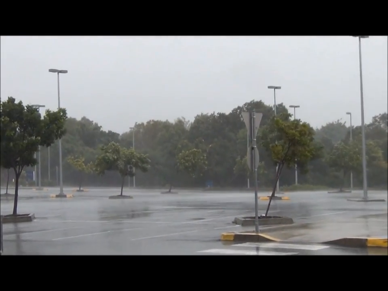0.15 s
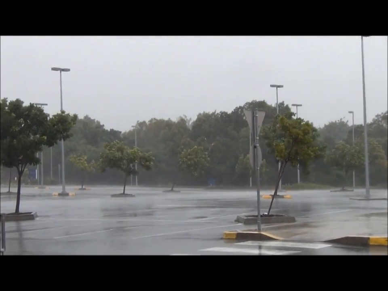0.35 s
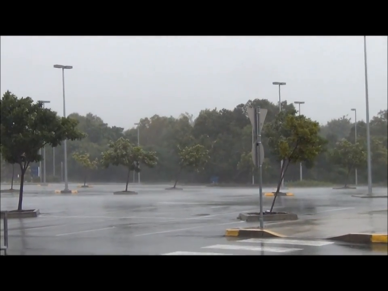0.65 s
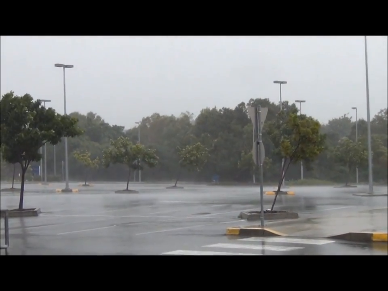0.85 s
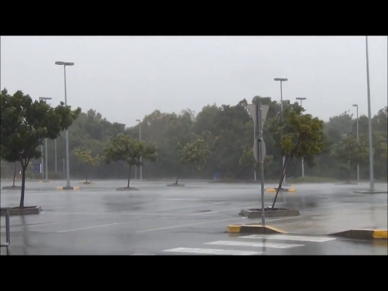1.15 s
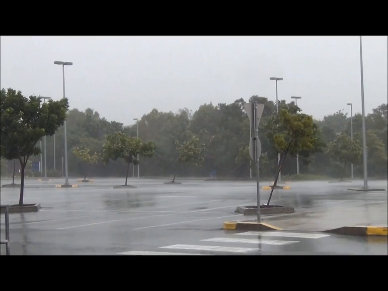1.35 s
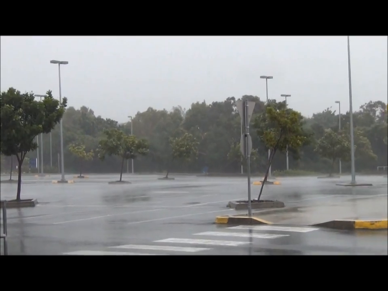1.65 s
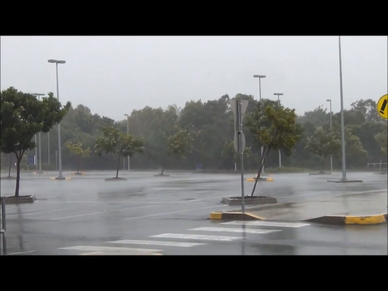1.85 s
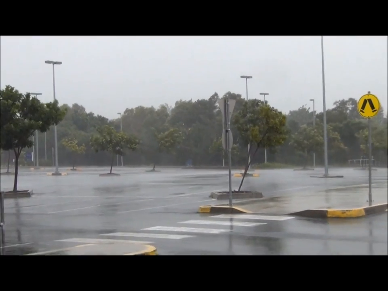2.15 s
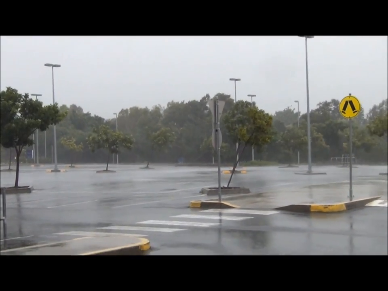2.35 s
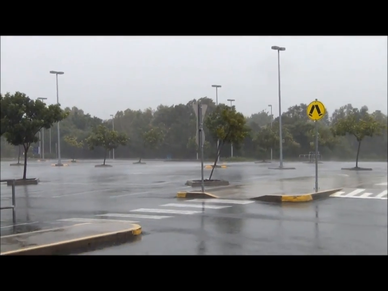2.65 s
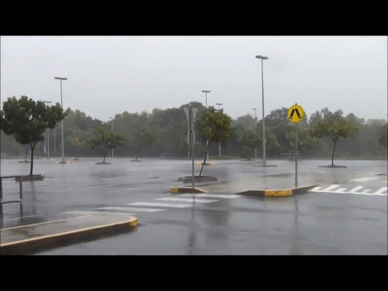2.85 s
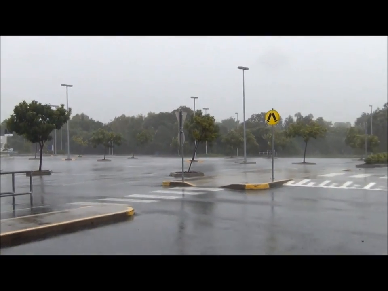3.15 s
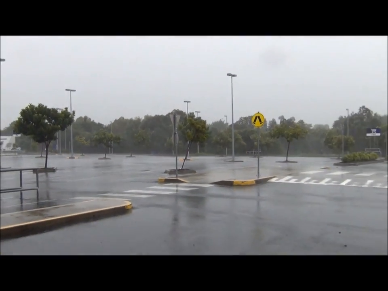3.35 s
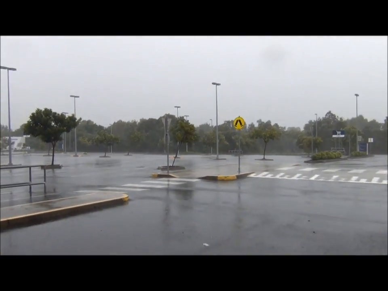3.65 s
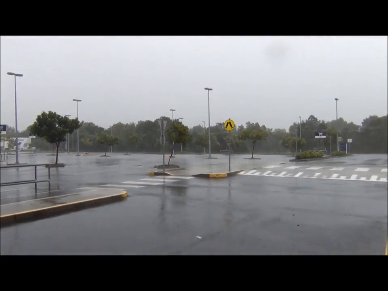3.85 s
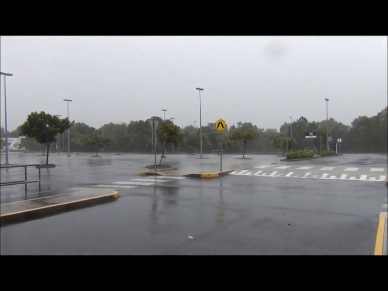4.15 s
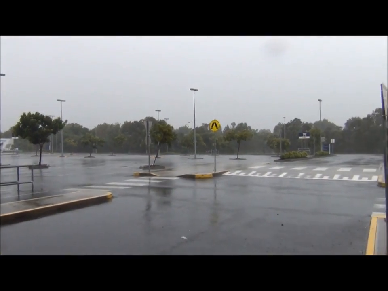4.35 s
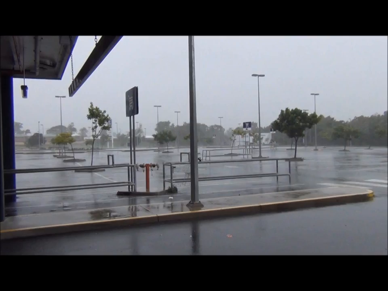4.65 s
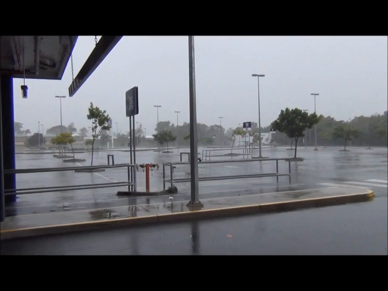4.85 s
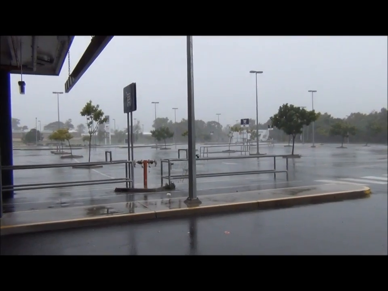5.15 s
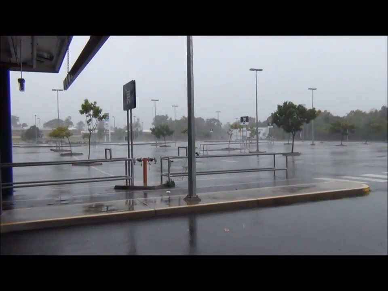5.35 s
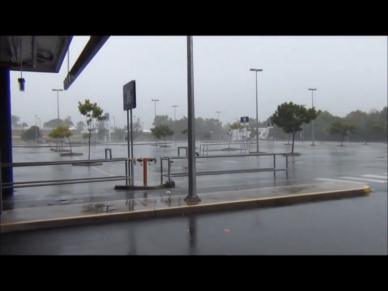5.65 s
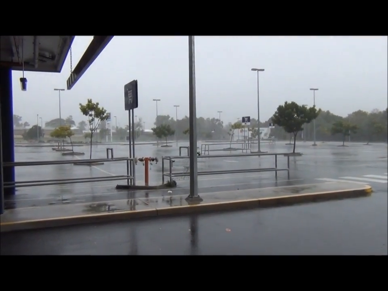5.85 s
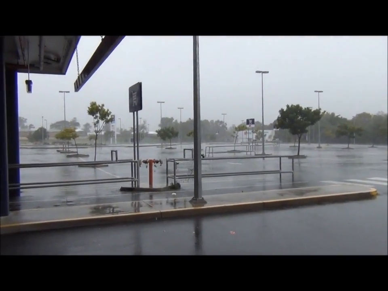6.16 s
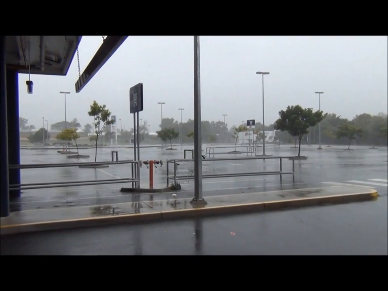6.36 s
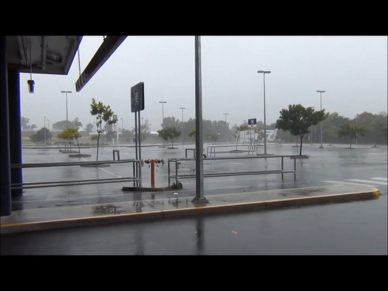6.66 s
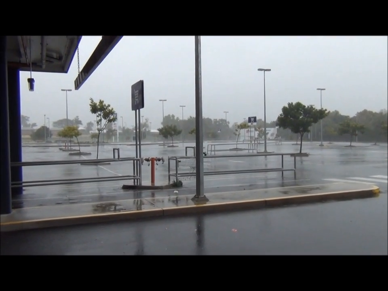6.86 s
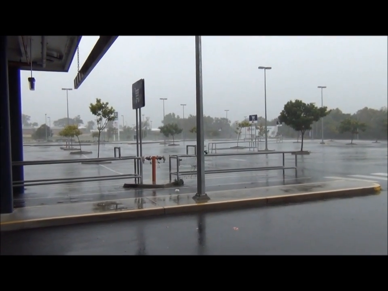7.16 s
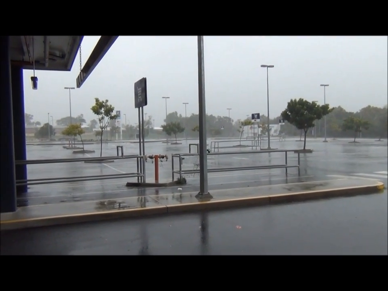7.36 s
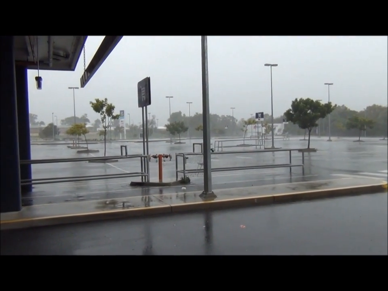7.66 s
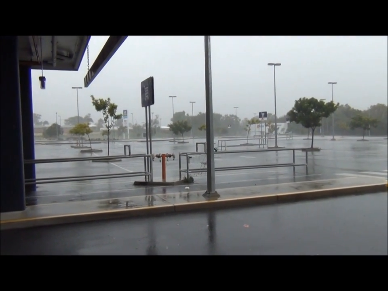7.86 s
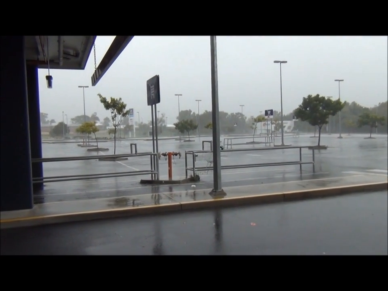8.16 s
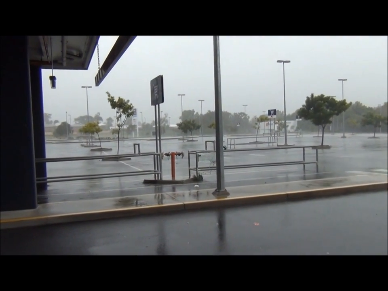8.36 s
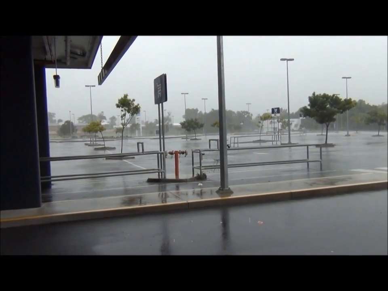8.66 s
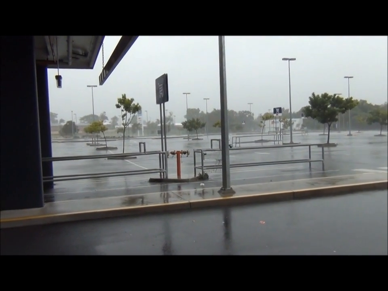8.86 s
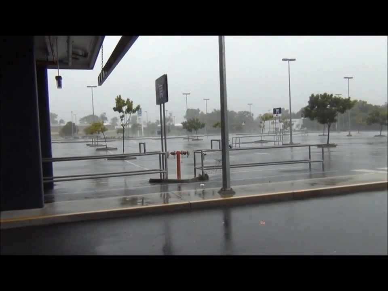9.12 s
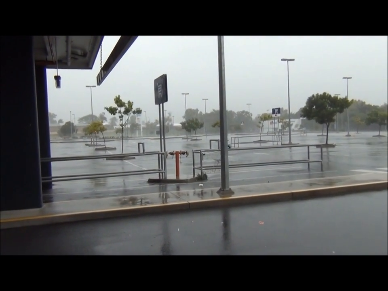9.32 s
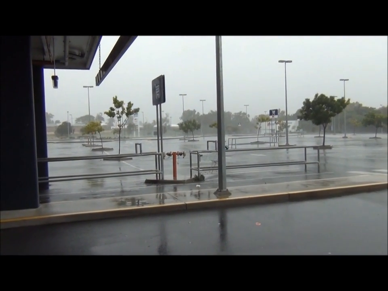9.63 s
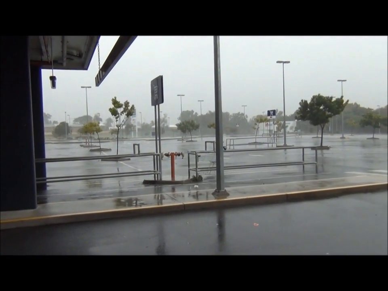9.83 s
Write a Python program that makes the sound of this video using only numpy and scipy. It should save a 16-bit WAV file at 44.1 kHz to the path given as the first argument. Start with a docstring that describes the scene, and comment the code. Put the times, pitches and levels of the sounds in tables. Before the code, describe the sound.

Heavy rain roars steadily over a wet open car park, wind buffeting the microphone, brief silence midway, then closer drops ticking and an engine humming.

```python
"""A car park in heavy rain, heard from under a shop awning: first facing out, then, after a short
silence, along the wall. Rain is noise in third-octave slices, grained by random drops; wind on the
microphone is low noise in uneven puffs. Close drops are filtered noise ticks with splashes, plops
are rising bubbles, a small metal part jingles in decaying modes, and a generator behind the building
drones in multiples of its engine cycle. A faint electronic whine lies under it all."""
import sys
import numpy as np
from scipy import signal
from scipy.fft import rfft, irfft, next_fast_len
from scipy.io import wavfile
from scipy.ndimage import uniform_filter1d

SR = 44100
rng = np.random.default_rng(int(sys.argv[2]) if len(sys.argv) > 2 else 0)


def unload_audio(sound):
    """Save the sound as a 16-bit wav file, at the path given as the first command line argument."""
    columns = np.transpose(np.atleast_2d(sound))
    # keep every value between -1 and 1, then stretch to whole-number steps
    steps = np.round(np.clip(columns, -1, 1) * 32767)
    wavfile.write(sys.argv[1], SR, steps.astype(np.int16))


N = 440559
MOVE_S = 4.75  # from here on, the second standpoint
T = np.arange(N) / SR
SECOND = T > MOVE_S
MS = np.int32(1000 * T)  # whole milliseconds at each sample


def rain(roar_db, spray_db, runoff_db, pan_db):
    """Far drops merge into a roar; near ones stay grainy in the treble, which follows the spray."""
    # rain colour, density per Hz before the overall level: centre_hz, first_standpoint_db, second_standpoint_db
    rain_colour = [(160, -9.5, -21), (244, -4, -5), (329, 5.5, 5), (484, 2.5, 0), (720, 1.5, 0.5),
                   (1036, -1, -3), (1300, -0.5, -2.5), (1970, -3.5, -4.5), (2700, -6, -8.5),
                   (3480, -6.5, -9), (4090, -7, -13.5), (6500, -8.5, -17), (9000, -15.5, -20.5),
                   (12000, -17.5, -22), (16000, -22, -29.5)]
    fine = spatter(900, 3.4, 0.00024)
    coarse = spatter(60, 2.9, 0.013)
    drips = spatter(40, 1.5, 0.012)  # runoff from the awning edge
    sheet = walk(4.5)  # slow swell shared by the upper slices
    out = 0
    centres = 160 * 2 ** np.arange(0, 6.8, 1 / 3)
    for hz, pair in bands(rng.standard_normal((2, N)), centres):
        near = np.clip(np.log2(hz / 900) / 3.3, 0, 1)
        runoff = np.exp(-(np.log2(hz / 2800) / 0.6) ** 2)
        treble = np.clip(np.log2(hz / 2800) / 0.76, 0, 1)
        near_power = near * (0.25 * fine ** 2 + 0.22 * coarse ** 2)
        drip_power = 0.25 * runoff * (drips ** 2 - .5)
        grain = np.sqrt(1 - 0.38 * near + near_power + drip_power)
        colour_db = np.float32(np.where(SECOND, at(rain_colour, hz, column=2), at(rain_colour, hz)))
        db = colour_db + treble * spray_db + runoff * runoff_db
        db = db + .8 * near * sheet + 0.85 * walk(12)
        out = out + undb(db) * np.float32(grain) * spread(pair, hz) * lean(pan_db, hz)
    return out * undb(roar_db + 16.0)


def spatter(per_s, scatter_db, tail_s):
    """Drops at random moments, some bigger than most; each is a short burst of splash."""
    size_db = scatter_db * np.minimum(rng.exponential(size=N), 3)
    blows = (rng.random(N) < per_s / SR) * undb(size_db)
    power = signal.lfilter([1], [1, -np.exp(-1 / (tail_s * SR))], blows ** 2)
    return unit(power ** .5)


def dips():
    """The level drops suddenly, then creeps up at a fixed rate; no dip outlasts its standpoint."""
    # sudden dips: start_s, depth_db
    sudden_dips = [(-.03, 10.5), (3.96, 6.5), (5.585, 8)]
    fall_s, creep_db_per_s = 0.022, 2.5
    out = 0
    for s, depth_db in sudden_dips:
        left_db = np.maximum(depth_db - creep_db_per_s * (T - s), 0)
        left_db = left_db * np.clip((T - s) / fall_s, 0, 1)
        out = out - left_db * (SECOND == (s > MOVE_S))
    return np.float32(out)


def wind(rumble_db, deep_db):
    """Eddies over the microphone: a low rumble in uneven puffs; big slow eddies add the deepest part."""
    # rumble colour, density per Hz before the overall level: centre_hz, level_db
    rumble_colour = [(30, -46.5), (50, -24.5), (80, -13.5), (130, -4), (200, 0.5), (330, -3.5),
                     (480, -11.5), (800, -24.5)]
    out, puffs = 0, walk(14)
    centres = 31 * 2 ** np.arange(0, 4.8, 1 / 3)
    for hz, pair in bands(rng.standard_normal((2, N)), centres):
        deep = np.clip(np.log2(140 / hz) / 1.3, 0, 1)
        db = at(rumble_colour, hz) + deep * deep_db + 1.1 * puffs + walk(9)
        out = out + undb(db) * spread(pair, hz)
    return out * undb(rumble_db + 22)


def gusts(steady_db):
    """Gusts hit the microphone: the power of each rises, holds and falls on top of the steady wind."""
    # gusts, levels before the overall wind gain: start_s, hold_s, rumble_db
    gust_rows = [(0, 0.13, -17.5), (0.164, 0.14, -14), (0.48, 0.041, -19), (1.2, 0.11, -20.5),
                 (1.48, 0.21, -27.5), (6.38, .03, -28.5), (9.044, 0.28, -34)]
    rise_s, fall_s = 0.047, 0.2
    power = undb(steady_db) ** 2
    for s, hold_s, db in gust_rows:
        rise = (T - s) / rise_s
        fall = 1 - (T - s - rise_s - hold_s) / fall_s
        shape = np.clip(np.minimum(rise, fall), 0, 1)
        power = power + (undb(db) * shape) ** 2
    return np.float32(10 * np.log10(power))


def drops(dip_db):
    """A sharp tick coloured by the surface that is hit, spray falling back after it, and a duller splash."""
    # big drops close to the microphone: start_s, tick_peak_db (before panning), centre_hz, width_hz
    big_drops = [(.827, -23, 10000, 9000), (1.07, -21, 10000, 6000), (2.09, -24, 6500, 5000),
                 (2.36, -25, 10000, 8000), (2.860, -22, 11000, 7000), (2.909, -17.5, 9000, 5000),
                 (3.066, -23, 12500, 5000), (3.134, -21, 8500, 5000), (3.366, -16, 9000, 8000),
                 (3.986, -19, 7250, 5000), (5.577, -23, 8700, 1300), (5.611, -20, 11000, 8000),
                 (5.835, -20.5, 8140, 3000), (6.102, -22, 8500, 7000), (6.173, -24, 8600, 1300),
                 (6.20, -25, 12000, 5000), (6.296, -22, 10000, 7000), (6.397, -24, 6500, 5000),
                 (6.485, -22, 8500, 3000), (6.747, -22, 8700, 1500), (6.970, -22, 12000, 5000),
                 (7.294, -26, 8740, 900), (7.365, -24, 9000, 1500), (7.410, -16, 9000, 2500),
                 (7.505, -20, 9100, 2000), (7.713, -23, 8000, 4000), (7.746, -20.5, 8700, 900),
                 (7.840, -16.5, 8050, 6000), (8.028, -22.5, 7300, 4500), (8.079, -25, 8000, 3000),
                 (8.120, -18, 12000, 7000), (8.337, -21.5, 7600, 3000), (8.371, -18, 13000, 6000),
                 (8.467, -22, 7900, 3000), (8.520, -18.5, 8150, 2500), (8.641, -22, 8000, 6000),
                 (8.876, -26, 13500, 4000), (9.245, -29, 14500, 3000), (9.395, -30, 9000, 2000),
                 (9.512, -27, 13500, 4000)]
    # higher ticks splash less than those at the usual pitch
    usual_hz, usual_splash_db, splash_db_per_khz = 8700, -10, -2
    pan_spread_db = 3.5  # close drops land to either side
    out, t = np.zeros((2, N + SR)), np.arange(SR // 12) / SR
    rows = list(big_drops) + small_drops(dip_db)
    crack, wash = rng.standard_normal((len(rows), 2, len(t))).swapaxes(0, 1)
    wash = unit(band(band(wash, 3300, 4500), 3300, 4500))
    wash = wash * np.exp(-t / 0.017) * np.minimum(t / .001, 1)
    sides = rng.standard_normal(len(rows))
    for (s, db, hz, width), noise, splash, side in zip(rows, crack, wash, sides):
        splash_db = usual_splash_db + splash_db_per_khz * (hz - usual_hz) / 1000
        burst = noise * (np.exp(-t / 0.00092) + 0.27 * np.exp(-t / 0.016))  # impact, then spray
        tick = band(band(burst, hz, width), hz, width)
        gain = undb(db + pan_spread_db * side * np.array([[.5], [-.5]]))
        sound = tick / abs(tick).max() + undb(splash_db) * splash
        out[:, int(s * SR):][:, :len(t)] += gain * sound
    return out[:, :N]


def small_drops(dip_db):
    """Lesser drops at random moments, mostly faint, some narrow and some broad, as rows like the big ones."""
    place, size, pitch, width = rng.random((150, 4)).T
    s = place * N / SR
    db = -28.5 + 3 * (2 * size ** 2 - 1)
    hz = 10500 + 3500 * (2 * pitch - 1)
    return list(zip(s, db + np.interp(s, T, dip_db), hz, 6000 * (.3 + width)))


def plops():
    """Heavier drips plop into a puddle: a rough bubble whose pitch rises a little as it dies."""
    # plops: start_s, level_db (before roughness and decay), starting_pitch_hz
    puddle_drips = [(1.4295, -22, 3060), (1.4370, -24, 2430), (5.2609, -22, 3240), (7.3638, -21, 2140),
                    (7.4095, -19, 2400), (7.5682, -22, 3570), (7.8492, -16, 3670), (7.851, -22, 4660),
                    (8.1604, -18, 2130), (8.3444, -22, 2000), (8.5245, -19, 2170)]
    out, t = np.zeros(N + SR), np.arange(SR // 20) / SR
    noises = rng.standard_normal((len(puddle_drips), len(t)))
    for (s, db, hz), noise in zip(puddle_drips, noises):
        rough = 0.7 + 0.66 * unit(uniform_filter1d(noise, size=16))
        envelope = np.exp(-t / 0.0081) * np.minimum(t / 0.001, 1)
        bubble = np.sin(2 * np.pi * hz * t * (1 + 2.6 * t)) * envelope
        out[int(s * SR):][:len(t)] += undb(db) * rough * bubble
    return out[:N]


def jingle():
    """A small metal part: each knock is a short rattle that excites the modes near its own pitch most."""
    # modes of the metal: pitch_hz, level_db (at a knock of the same pitch), t60_s
    metal_modes = [(7900, -10, .02), (10200, -9, 0.028), (11100, -8, 0.016), (12000, -5, 0.021),
                   (12800, -14, 0.016), (15000, -7, .02), (15200, -8, .03)]
    # knocks: start_s, ringing_peak_db, favoured_pitch_hz
    knocks = [(9.7365, -16.5, 11700), (9.747, -25, 12900), (9.754, -24, 15000), (9.835, -27, 10200),
              (9.848, -15.5, 13000)]
    rattle_s, favour_db_per_khz = 0.0083, 4
    out, t = np.zeros(N + SR), np.arange(SR // 10) / SR
    noises = rng.standard_normal((len(knocks), len(t)))
    for (s, db, pitch_hz), noise in zip(knocks, noises):
        rattle = noise * np.sin(np.pi * np.minimum(t / rattle_s, 1) ** .5)
        rings = 0
        for hz, mode_db, t60 in metal_modes:
            far_khz = abs(hz - pitch_hz) / 1000
            rings = rings + undb(mode_db - favour_db_per_khz * far_khz) * ring(rattle, hz, t60)
        sound = rings / abs(rings).max() + .25 * band(rattle, 9500, 11000)
        out[int(s * SR):][:len(t)] += undb(db) * sound
    return out[:N]


def generator(firing_db, roar_db):
    """Steady engine: a strong firing tone and weaker multiples of the cycle whose levels waver at random."""
    # other multiples, levels over the carried level: multiple, first_standpoint_db, second_standpoint_db
    orders = [(3, -18, -22), (5, -20, -16), (6, -10.5, -13), (8, -4.5, -17), (13, -4.5, -7), (15, -14, -17),
              (17, -8, -12), (18, -9, -14), (42, -6, -30), (46, -8, -17), (47, -14.5, -14), (48, -9.5, -21)]
    cycle_hz, firings = 27.675, 4  # mean engine cycle, firings in each cycle
    speed = 1 + 0.000618 * np.float64(walk(2.017))
    phase = 2 * np.pi * np.cumsum(cycle_hz * speed) / SR
    out = undb(firing_db + 0.43 * walk(12)) * np.sin(firings * phase)
    exhaust_db = (firing_db + roar_db) / 2  # low multiples swell with the firing tone
    casing_db = 0.72 * roar_db - 12.5  # high ones swell less than the rain
    for k, first_db, second_db in orders:
        carry_db = exhaust_db if k < 9 else casing_db
        db = carry_db + np.where(SECOND, second_db, first_db) + 0.8 * walk(4.4)
        out = out + undb(db) * np.sin(round(k) * phase + 2 * np.pi * rng.random())
    return np.sqrt(2) * out  # levels are rms


def whine():
    """Faint whine of the camera electronics: one steady high sine."""
    line_hz, line_db = 15625, -68
    return np.sqrt(2) * undb(line_db) * np.sin(2 * np.pi * line_hz * T)


def lean(pan_db, hz):
    """Left and right gain of a slight lean to one side; the treble leans less."""
    share = np.clip(1.3 - np.log2(hz / 500) / 3.3, .2, 1)
    gain = undb(share * pan_db / 2)
    return np.array([gain, 1 / gain])


def spread(pair, hz):
    """Mid and side turned into left and right."""
    # side level over mid by frequency: centre_hz, first_standpoint_db, second_standpoint_db
    side_over_mid = [(40, 1, -18), (200, -24.5, -24), (700, -23, -17), (2400, -49.5, -27.5),
                     (4400, -43, -32.5), (7000, -4, -5.5), (11000, -24, -24.5), (15000, -44.5, -53)]
    side_gain = np.where(SECOND, undb(at(side_over_mid, hz, column=2)), undb(at(side_over_mid, hz)))
    side = side_gain * pair[1]
    return np.array([pair[0] + side, pair[0] - side])


def undb(db):
    """Gain of a level in dB."""
    return np.exp(np.float32(np.asarray(db) * np.log(10) / 20))


def curves(tables):
    """Columns of the joined tables, one value a sample."""
    s, *columns = np.transpose(np.concatenate(tables))
    return [np.float32(np.interp(T, s, c)) for c in columns]


def at(table, hz, column=1):
    """A spectrum table read on a log-frequency axis."""
    table = np.array(table, float)
    return np.interp(np.log(hz), np.log(table[:, 0]), table[:, column])


def walk(rate):
    """Random levels joined smoothly, rate a second; spread near 1."""
    k, size = int(1000 / rate), 1000 * N // SR + 1  # milliseconds: one step, the whole length
    steps = np.repeat(rng.standard_normal(size // k + 1), k)
    smooth = uniform_filter1d(uniform_filter1d(steps, k), k)
    return np.float32(1.3 * smooth)[MS]


def bands(x, centres):
    """Overlapping third-octave slices whose cosine-squared skirts add up to the whole."""
    size = next_fast_len(N, True)
    spectrum = rfft(np.float32(x), size)
    octave = np.log2(np.arange(1, size // 2 + 2) * SR / size)
    for hz in centres:
        away = octave - np.log2(hz)
        inside = abs(away) < 1 / 3
        part = np.zeros_like(spectrum)
        part[:, inside] = spectrum[:, inside] * np.cos(3 * np.pi / 2 * away[inside]) ** 2
        yield hz, irfft(part, size)[..., :N]


def unit(x):
    """Scaled to rms 1."""
    return x / np.sqrt(np.mean(x ** 2))


def ring(x, hz, t60):
    """One decaying mode, peak near 1 for a unit blow."""
    p = np.exp(2j * np.pi * hz / SR - np.log(1000) / (t60 * SR))
    return signal.lfilter([1], [1, -p], x).imag


def band(x, hz, width):
    """Gentle band-pass with two poles."""
    edges = [hz - width / 2, min(hz + width / 2, .45 * SR)]
    return signal.sosfilt(signal.butter(1, edges, "band", fs=SR, output="sos"), x)


def scene():
    """Rain, wind, close drops, plops, jingle and generator, steered by level curves at each standpoint."""
    # one table a standpoint, levels before the overall gains: time_s, rain_roar_db, steady_wind_rumble_db
    weather = [
        [(0, -26, -20.5), (.75, -29, -29.5), (1.3, -29, -24), (1.9, -30, -33.5), (2.5, -30, -33.5),
         (3.3, -29.5, -33), (3.96, -29, -30), (4.62, -29, -28)],
        [(4.88, -29, -31), (5.57, -29.5, -29), (6.0, -29.5, -34), (6.35, -30, -39), (6.9, -30, -34.5),
         (7.6, -28.5, -30), (7.85, -26.5, -29.5), (8.1, -29.5, -29.5), (8.7, -29.5, -28.5), (9.7, -32.5, -27),
         (9.8, -35, -30.5), (9.99, -35.5, -27.5)],
    ]
    # one table a standpoint: time_s, firing_tone_db, left_minus_right_db, extra_deep_wind_db,
    # extra_spray_treble_db, extra_runoff_db (near 3 kHz)
    drone_and_tone = [
        [(0.0, -32.5, 0.5, 8, -4.5, -2), (1.07, -53, -1, 4, -1.5, 0.2), (1.34, -42, -0.5, 5, -0.5, 0.5),
         (1.85, -46.5, -1.5, 6.5, -1.5, 0.5), (2.1, -46.5, 0, -3, -2, -0.5), (3.1, -44.5, -1.3, -2, -2, -1),
         (3.9, -42.5, 0.8, -4, -4, -1.5), (4.62, -39, 1, -8, -4, -1)],
        [(4.88, -33, 1, 7, 1, -1.5), (5.48, -34, 1, 2, 2, 2), (5.77, -49, 0.5, -1, 4, 1.5),
         (7.8, -31.5, 1.7, 2, 1, -0.5), (9.19, -22.5, 1.5, 15, -0.5, -1.05), (9.99, -25.5, 1.5, 14, 2, -0.5)],
    ]
    rain_db, steady_db = curves(weather)
    firing_db, pan_db, deep_db, spray_db, runoff_db = curves(drone_and_tone)
    dip_db = dips()
    roar_db = rain_db + dip_db
    rumble_db = gusts(steady_db) + dip_db
    low = wind(rumble_db, deep_db) + generator(firing_db, roar_db)
    downpour = rain(roar_db, spray_db, runoff_db, pan_db)
    return downpour + lean(pan_db, 150) * low + drops(dip_db) + plops() + jingle()


def record(dry):
    """Whine added, the sound broken off with a faint dying tail and faded back in, the top cut off."""
    off_s, back_s, fade_in_s = 4.6238, 4.868, .015
    tail_db, tail_s = -19, .023
    dying = undb(tail_db) * np.clip(1 - (T - off_s) / tail_s, 0, 1)
    first = np.where(T < off_s, 1, dying)
    gain = np.where(SECOND, np.clip((T - back_s) / fade_in_s, 0, 1), first)
    top_cut = signal.ellip(10, .2, 80, 15900, fs=SR, output="sos")
    return signal.sosfilt(top_cut, (dry + whine()) * gain)


dry = scene()
out = record(dry)
unload_audio(out)
```